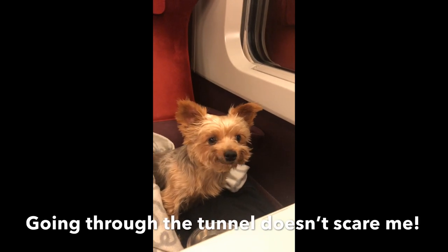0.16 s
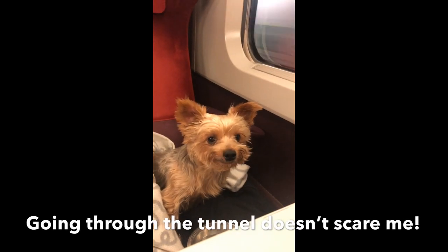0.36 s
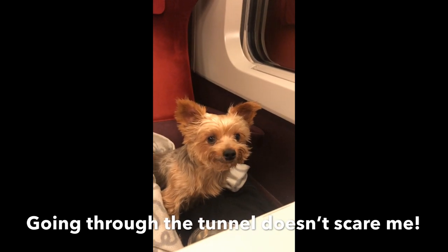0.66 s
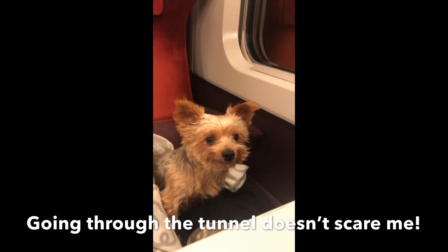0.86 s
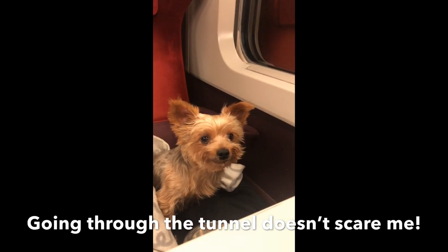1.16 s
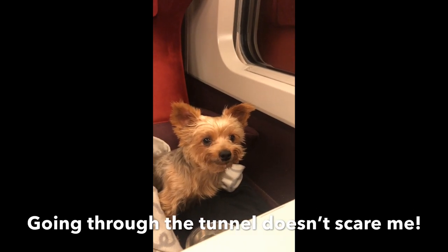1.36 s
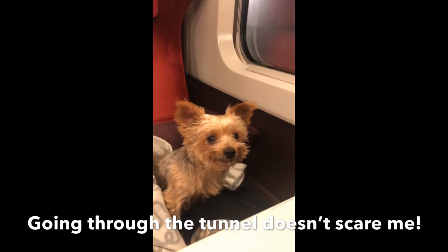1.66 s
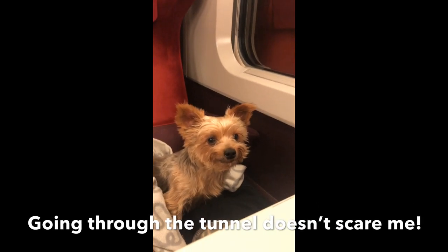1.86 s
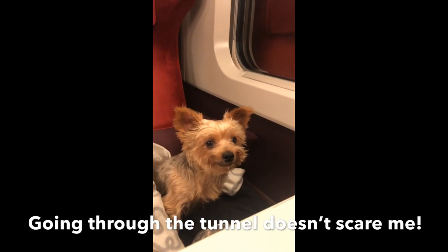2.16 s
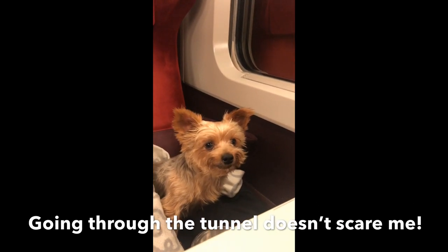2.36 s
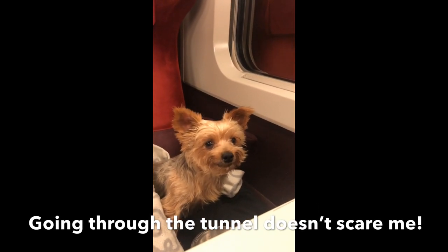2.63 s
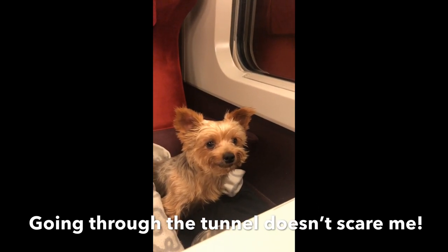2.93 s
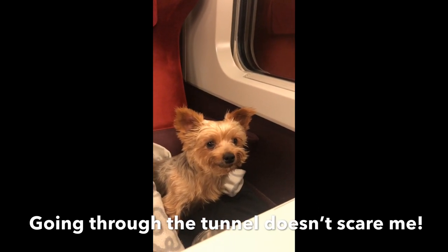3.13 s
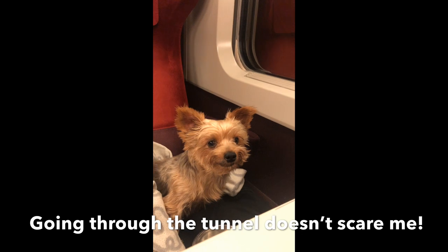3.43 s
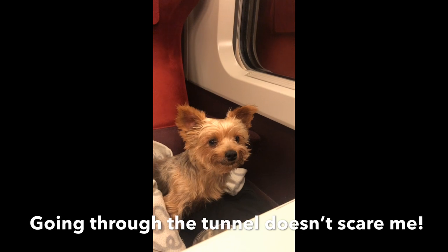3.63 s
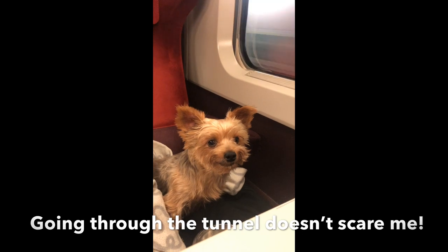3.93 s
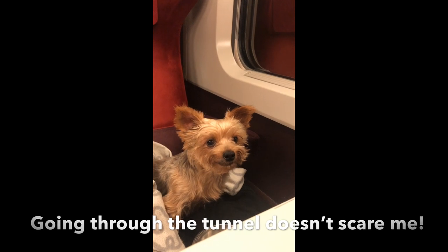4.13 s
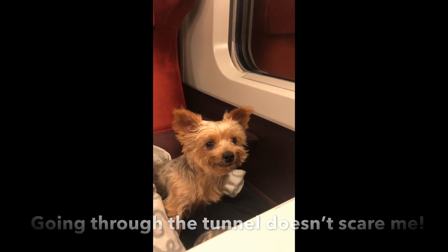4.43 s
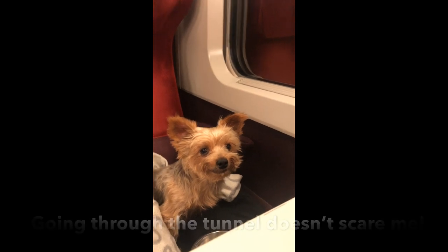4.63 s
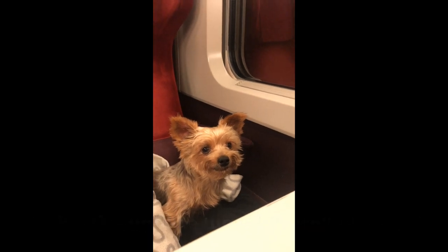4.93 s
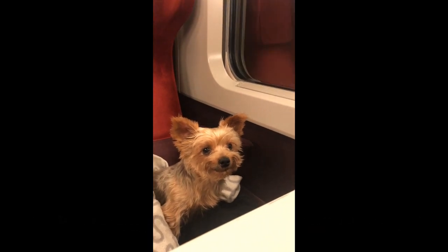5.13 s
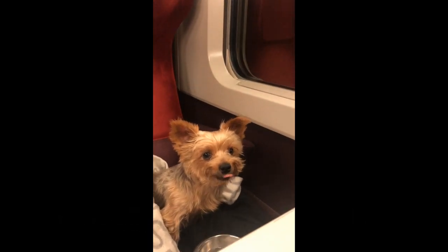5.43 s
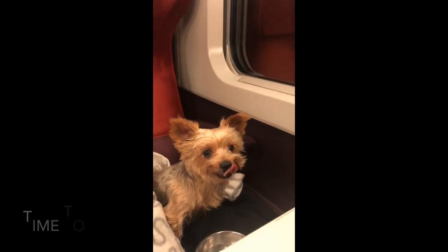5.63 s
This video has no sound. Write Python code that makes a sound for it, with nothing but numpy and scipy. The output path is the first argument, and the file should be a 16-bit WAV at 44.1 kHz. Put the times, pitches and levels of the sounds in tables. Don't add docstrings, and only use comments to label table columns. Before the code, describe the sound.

Steady muffled train roar heard from a passenger seat, with soft bumps, dry fabric clicks early on and a rising cloth hiss at the end.

```python
import sys
import numpy as np
from scipy import signal
from scipy.io import wavfile
from scipy.ndimage import uniform_filter1d

SR = 44100
rng = np.random.default_rng(int(sys.argv[2]) if len(sys.argv) > 2 else 0)


def ratio(d):
    e = np.asarray(d, float) / 20
    return 10 ** e


def store_wav(level_fs):
    pcm = np.round(np.clip(np.atleast_2d(level_fs), -1, 1) * 32767)
    wavfile.write(sys.argv[1], SR, pcm.T.astype(np.int16))


N = 255118

# (frequency [Hz], width [Hz])
BODY_MODES = [(53, 19), (79, 24.8), (124, 28.3)]
BODY_MODE_DB = [-39, -37, -39.5]
# (time [s], shaking [dB])
TRACK_SHAKE = [(0, 1.5), (.75, 1), (1.4, 0.5), (2.1, 0.5), (2.7, 0), (3.3, 1.5), (3.9, 0), (4.3, 1),
               (4.9, -1), (5.45, 1.5), (5.78, -4)]
# (time [s], level [dB], frequency [Hz])
TRACK_JOLTS = [(0.06, -31, 53), (0.14, -31.5, 124), (0.34, -27.0, 79), (0.6, -27.5, 79), (0.68, -31.0, 53),
               (0.82, -34, 124), (0.9, -32.0, 79), (1.02, -30, 79), (1.12, -31, 53), (1.15, -32, 124),
               (1.25, -33.5, 53), (1.39, -28.5, 53), (1.42, -32, 79), (1.77, -31, 79), (1.88, -32, 79),
               (2.53, -30, 79), (2.7, -31.5, 53), (3.69, -32.0, 53), (3.78, -31.5, 53), (3.81, -32.5, 124),
               (4.09, -28, 79), (4.48, -32, 53), (4.65, -31.5, 124), (4.72, -32, 79), (4.88, -29.5, 53),
               (4.94, -33, 79), (4.97, -32.0, 53), (5.09, -32.0, 79), (5.31, -30.5, 79), (5.76, -29.5, 79)]
# (time [s], contact level [dB])
WHEEL_CONTACT = [(0, -57.5), (.76, -54), (1.3, -54), (2.2, -55), (2.8, -57), (3.4, -60), (3.8, -57),
                 (4.6, -58), (5.2, -59.5), (5.78, -57)]
# (frequency [Hz], level [dB per Hz])
ROAR_COLOUR = [(25, -21), (60, 6.5), (150, -3.5), (215, -0.5), (480, 0), (640, -3.5), (880, -9),
               (1150, -18), (1650, -21.5), (2610, -28), (2720, -32.5), (5000, -43.5), (7500, -50.5),
               (16000, -64.5)]
# (frequency [Hz], width [Hz], level [dB])
WALL_PANELS = [(167, 29.4, -46), (264.7, 38, -47), (469, 62, -45.5), (593.7, 62, -49.5), (758, 107, -52)]
# (frequency [Hz], width [Hz], level [dB], share of the contact swell [1])
RAIL_TONES = [(1880, 236, -1, 0.84), (2465, 46, -10.5, .3), (2560, 54, -17, .2)]
# (frequency [Hz], level [dB per Hz])
CLOTH_COLOUR = [(1000, 3.5), (3000, 12), (6500, 1.5), (9000, -3.5), (12000, -13), (16000, -42)]
# (start [s], hold [s], hiss level [dB], fine high haze level [dB])
CLOTH_STROKES = [(-.04, 0.44, -63.5, -80), (1.2, .05, -67, -80), (1.36, 0.43, -72, -83),
                 (1.86, .25, -68, -79), (2.16, .4, -80, -82), (2.82, .2, -70, -84), (3.36, .05, -76, -79),
                 (3.7, .22, -71, -84), (5.05, .5, -66.5, -78), (5.303, .4, -67, -82),
                 (5.583, .3, -61.5, -73), (5.676, .2, -59, -66), (5.734, .1, -55, -64)]
# (frequency [Hz], level [dB])
FIBRE_COLOUR = [(0, -36), (1000, -18), (2200, 11), (7000, 3.5), (10000, -0.5), (13000, -5.5), (16000, -1),
                (22050, -4)]
# (start [s], end [s], start pitch [Hz], end pitch [Hz], level [dB])
BAG_WHISKS = [
    (.157, .24, 6600, 6900, -70),
    (.24, .34, 6700, 6500, -69),
    (1.27, 1.353, 490, 490, -35),
    (1.99, 2.06, 8500, 9000, -72),
    (2.26, 2.3, 8800, 9500, -74),
    (2.94, 3.12, 9700, 9800, -82),
    (1.8, 2.2, 13800, 14200, -86),
    (5.08, 5.6, 14200, 14200, -85),
    (.0, .4, 4300, 4100, -75),
]
# (peak time [s], level [dB], ring pitch [Hz], ring share [dB])
CRUNCHES_OF_CLOTH = [(.092, -58.5, 8950, -2), (.428, -74, 11200, 9), (.478, -54, 7700, -10),
                     (.767, -56, 7000, -12), (.968, -56.5, 8700, -2), (.99, -57, 5000, -6),
                     (1.003, -47.5, 3300, -3), (1.015, -49, 6760, -5), (1.035, -63, 4500, -1),
                     (1.27, -52, 3900, 6), (1.394, -57, 5000, -6), (1.465, -69, 9000, 2),
                     (1.678, -64, 5800, 3), (1.924, -60, 5200, 2), (2.075, -53, 8000, -22),
                     (2.088, -51.5, 4330, -5), (2.178, -66, 11000, -8), (2.300, -59.5, 5200, 0),
                     (2.345, -58, 11500, -14), (2.362, -62, 6200, -5), (2.41, -72, 10500, 0),
                     (2.52, -69, 9000, 1), (2.845, -68, 5800, -3), (2.866, -69, 11800, 4),
                     (2.988, -60, 6960, -6), (3.076, -61, 9500, -16), (3.345, -52, 6500, -10),
                     (3.368, -56, 7000, -10), (3.451, -52.5, 8200, -8), (5.087, -62, 6900, -6)]
# (peak time [s], level [dB], ring pitch [Hz], ring share [dB])
SUDDEN_SNAPS = [(.243, -63, 12000, -8), (.763, -47.5, 4300, 3), (1.128, -69, 8400, 0),
                (.476, -55, 7700, -3), (1.291, -55, 11500, -17), (1.292, -47, 2200, 7),
                (1.385, -49.5, 4200, -3), (1.548, -57, 4600, 9), (2.238, -69, 9000, 0),
                (2.473, -64, 8900, 18), (5.317, -67, 13500, 3)]
# (start [s], end [s], start pitch [Hz], end pitch [Hz], level [dB])
STRAP_SQUEAKS = [
    (1.104, 1.123, 9800, 9600, -81),
    (.96, .985, 6200, 6100, -69),
    (.995, 1.014, 3300, 3200, -62),
    (1.003, 1.052, 6260, 6900, -65),
    (1.662, 1.69, 2800, 2740, -57),
    (1.008, 1.024, 9250, 9050, -57),
    (.23, .35, 7200, 6400, -72),
    (2.984, 3.01, 7050, 7000, -69),
]
# (start [s], end [s], start pitch [Hz], end pitch [Hz], level [dB])
STRAP_CREAKS = [
    (1.006, 1.031, 3110, 3000, -55),
    (1.263, 1.278, 3140, 3070, -54),
]
CREAK_OVERTONES_DB = [0, -5, -17, -19, -17]
# (start [s], end [s], start pitch [Hz], end pitch [Hz], level [dB])
THIN_WHINES = [
    (1.03, 1.1, 8800, 8150, -74),
    (1.35, 1.664, 2465, 2465, -66),
    (1.71, 1.82, 2676, 2593, -61),
    (1.95, 2.075, 2465, 2490, -59),
    (5.203, 5.5, 2340, 2560, -64),
]


def evened(x):
    return x / np.sqrt(np.mean(x ** 2) + 1e-20)


def curve(rows, column):
    rows = np.array(rows)
    return np.interp(np.arange(N) / SR, rows[:, 0], rows[:, column])


def add(mix, start_s, sound):
    part = mix[max(round(start_s * SR), 0):][:len(sound)]
    part += sound[:len(part)]


def resonate(x, hz, width):
    turn = np.exp(2j * np.pi * np.cumsum(hz * np.ones(len(x))) / SR)
    decay = np.exp(-np.pi * width / SR)
    smoothed = signal.lfilter([1 - decay], [1, -decay], x / turn)
    return 2 * (turn * smoothed).real


def hum(hz, width, size=N):
    once = resonate(rng.standard_normal(size), hz, width)
    return evened(resonate(once, hz, width))


def noise(colour, patchy_db, size):
    frames, hz = N // (size // 4) + 5, np.fft.rfftfreq(size, 1 / SR)
    real, imag, patches = rng.standard_normal((frames, len(hz), 3)).T
    patches = uniform_filter1d(patches, size=10, axis=0)
    patches = evened(uniform_filter1d(patches, size=12, axis=1))
    colour_hz, level_db = np.transpose(colour)
    colour_db = np.interp(np.log(hz + 1), np.log(colour_hz), level_db, left=-40)
    spectra = (real + 1j * imag) * ratio(colour_db[:, None] + patchy_db * patches)
    sound = signal.istft(spectra, nperseg=size, noverlap=3 * size // 4)[1]
    return evened(sound[:N])


def boom():
    jolt_s = 0.033
    out, t, modes_hz = np.zeros(N), np.arange(N) / SR, np.array(BODY_MODES)[:, 0]
    for k, (hz, width) in enumerate(BODY_MODES):
        mode = hum(hz, width)
        lumps = np.sqrt(abs(uniform_filter1d(mode ** 2, size=3000)) + 0.035)
        power = ratio(2 * (BODY_MODE_DB[k] + curve(TRACK_SHAKE, 1)))
        for s, db, jolt_hz in TRACK_JOLTS:
            if np.argmin(abs(modes_hz - jolt_hz)) == k:
                power = power + ratio(2 * db) * np.exp(-((t - s) / jolt_s) ** 2)
        out += np.sqrt(power) * evened(mode / lumps ** 0.75)
    return out


def roar():
    roar_db, contact_share = -33.5, 0.05
    contact_db = curve(WHEEL_CONTACT, 1)
    swell = ratio(contact_share * (contact_db - contact_db.mean()))
    panels = sum(ratio(db) * hum(hz, width) for hz, width, db in WALL_PANELS)
    return swell * (ratio(roar_db) * noise(ROAR_COLOUR, patchy_db=0.46, size=2048) + panels)


def rail_song():
    contact_db = curve(WHEEL_CONTACT, 1)
    mean_db = contact_db.mean()
    swell_db = contact_db - mean_db
    return sum(ratio(mean_db + db + share * swell_db) * hum(hz, width)
               for hz, width, db, share in RAIL_TONES)


def stroked(rest_db, column):
    rise_s, fall_s = 0.03, 0.092
    t, power = np.arange(N) / SR, ratio(2 * rest_db)
    for row in CLOTH_STROKES:
        start, hold = row[:2]
        fall_start = start + rise_s + hold
        shape = np.minimum((t - start) / rise_s, 1 - (t - fall_start) / fall_s)
        power = power + (ratio(row[column]) * np.clip(shape, 0, 1)) ** 2
    return np.sqrt(power)


def fibre_snap():
    hz, colour_db = np.transpose(FIBRE_COLOUR)
    power = ratio(2 * np.interp(np.linspace(0, SR / 2, 64), hz, colour_db))
    return signal.minimum_phase(signal.firwin2(129, np.linspace(0, 1, 64), power))


def sliding_cloth(fibre):
    sizes = ratio(3.0 * np.minimum(rng.exponential(1, N), 4))
    hits = rng.random(N) < 1500 / SR
    prickle = sizes * hits * rng.standard_normal(N)
    haze = hum(12600, 5500) + 0.76 * evened(signal.oaconvolve(prickle, fibre)[:N])
    hiss = noise(CLOTH_COLOUR, patchy_db=-0.5, size=256)
    return stroked(-79, column=2) * hiss + stroked(-88.5, column=3) * haze


def rubbed_tones(rows, width_share):
    out = np.zeros(N)
    for start, end, hz0, hz1, db in rows:
        size = round((end - start) * SR)
        tone = hum(np.linspace(hz0, hz1, size), width_share * hz0, size=size)
        lumps = np.sqrt(abs(uniform_filter1d(tone ** 2, size=400)) + 0.39)
        add(out, start, ratio(db) * evened(tone / lumps) * signal.windows.tukey(size, .5))
    return out


def bag_whisks():
    return rubbed_tones(BAG_WHISKS, 0.18)


def crackles(rows, rise_s, t60_s, fibre):
    out, t = np.zeros(N), np.arange(SR // 8) / SR
    for s, db, ring_hz, ring_db in rows:
        ring_t60_s = max(t60_s * (1 + 0.08 * (db + 61)), .01)
        clumps = ratio(0.88 * rng.exponential(1, len(t) // 48 + 1))
        clumps = clumps.repeat(48)[:len(t)]
        drive = evened(rng.standard_normal(len(t)) * clumps)
        drive[round(rise_s * SR)] = 0.27 / np.sqrt(rise_s)
        drive *= np.minimum(t / rise_s, 1) * ratio(-60 * np.maximum(t - rise_s, 0) / ring_t60_s)
        ring_width = 0.28 * ring_hz
        ring = 2.24 * resonate(resonate(drive, ring_hz, ring_width), ring_hz, ring_width)
        click = signal.oaconvolve(drive, fibre / np.linalg.norm(fibre))[:len(t)]
        blend = (click + ratio(ring_db) * ring) / np.sqrt(1 + ratio(2 * ring_db))
        add(out, s - rise_s, ratio(db) * blend)
    return out


def crunches(fibre):
    return crackles(CRUNCHES_OF_CLOTH, 0.0073, 0.083, fibre)


def strap_squeaks():
    creaks = [(start, end, k * hz0, k * hz1, db + over_db)
              for start, end, hz0, hz1, db in STRAP_CREAKS
              for k, over_db in enumerate(CREAK_OVERTONES_DB, start=1)]
    return rubbed_tones(STRAP_SQUEAKS + creaks, 0.021)


def snaps(fibre):
    return crackles(SUDDEN_SNAPS, 0.00093, 0.029, fibre)


def whines():
    return rubbed_tones(THIN_WHINES, 0.011)


def scene():
    fibre = fibre_snap()
    carriage = boom() + roar() + rail_song()
    cloth = sliding_cloth(fibre) + crunches(fibre) + snaps(fibre)
    bag_and_whines = bag_whisks() + strap_squeaks() + whines()
    return (carriage + cloth + bag_and_whines)[None]


def roll_off(x):
    return signal.sosfilt(signal.butter(12, 15950, fs=SR, output="sos"), x)


def record(dry):
    thin = signal.sosfilt(signal.butter(2, 36, "high", fs=SR, output="sos"), dry)
    power_db = 10 * np.log10(abs(uniform_filter1d(thin ** 2, size=600)) + 1e-12)
    over_db = np.maximum(power_db + 24.5, 0)
    held = thin / ratio(0.85 * uniform_filter1d(over_db, size=300))
    top_cut = signal.firwin(2047, 15785, window=("kaiser", 4), fs=SR)
    mix = signal.oaconvolve(held, top_cut[None], "same")
    return roll_off(mix)


dry = scene()
out = record(dry)
store_wav(out)
```